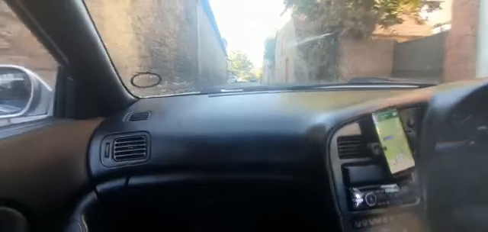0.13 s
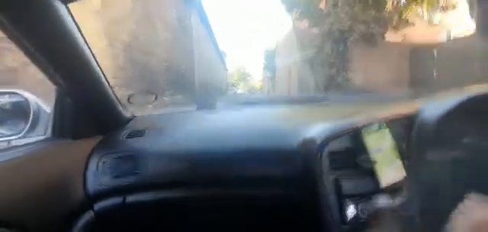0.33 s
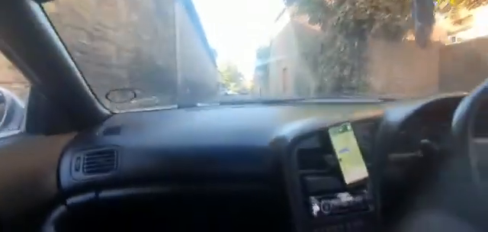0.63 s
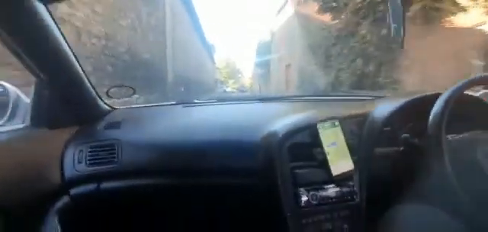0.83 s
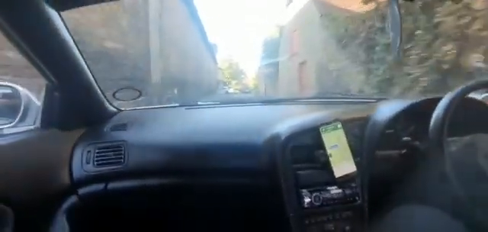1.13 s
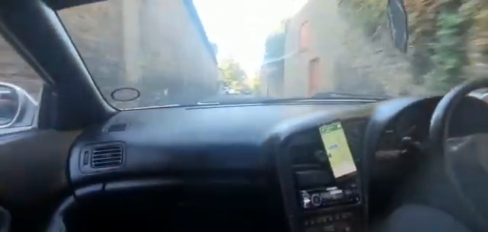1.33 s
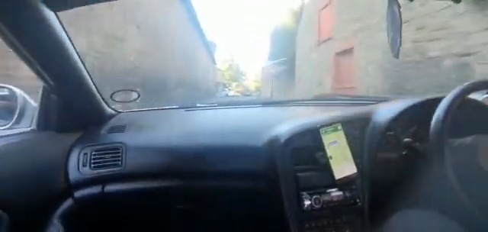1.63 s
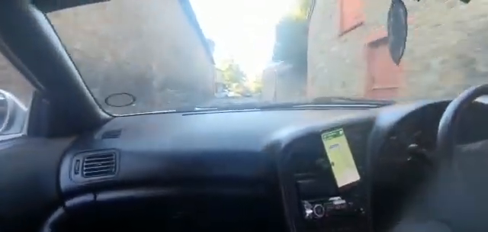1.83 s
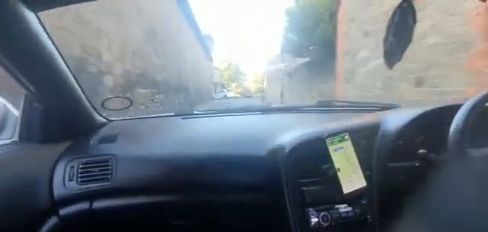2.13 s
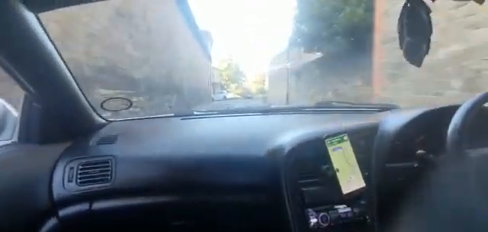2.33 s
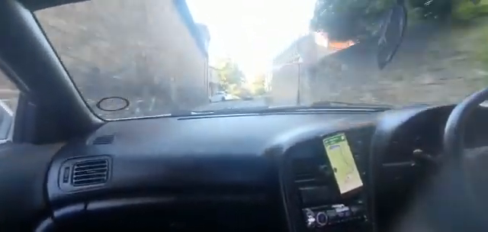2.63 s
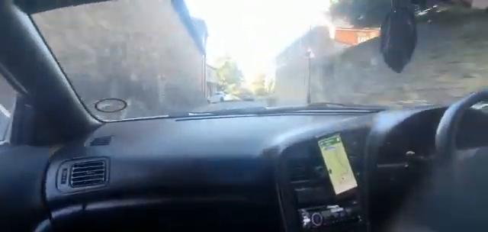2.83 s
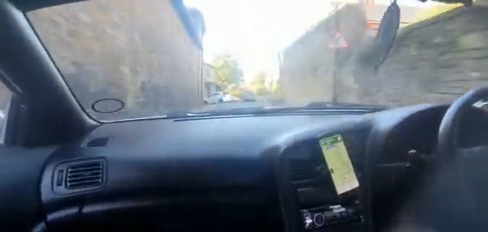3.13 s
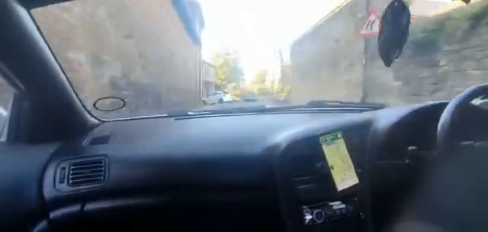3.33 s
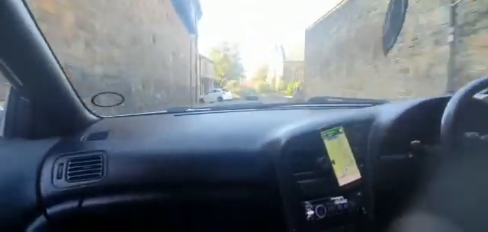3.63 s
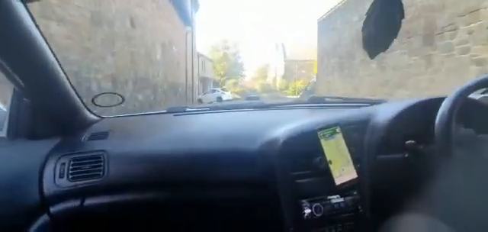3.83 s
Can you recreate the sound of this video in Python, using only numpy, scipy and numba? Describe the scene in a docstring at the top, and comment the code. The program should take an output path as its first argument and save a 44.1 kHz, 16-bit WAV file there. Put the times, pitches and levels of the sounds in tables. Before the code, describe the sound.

A turbocharged four-cylinder car accelerates down a narrow street, its deep boom rising under hissing intake air, then surges in a stuttering train of chuffs and settles to a low drone; phone held in the cabin.

```python
"""Inside a turbo four-cylinder car with the left window open, heard at a phone's two ports after a brief silence.
First it pulls hard: firing orders climb in pitch as the intake rush and the compressor's airy band swell.
The throttle shuts and the compressor surges: a fading train of noise chuffs, with duct resonances ringing, while
the revs fall. The next gear then drones on. Filtered noise makes road rumble and tyre ring throughout."""
import sys
import numpy as np
from scipy import signal
from scipy.fft import rfft, irfft
from scipy.io import wavfile
from scipy.ndimage import uniform_filter1d
from numba import njit

SR = 44100
rng = np.random.default_rng(int(sys.argv[2]) if len(sys.argv) > 2 else 0)


def file_out(sig):
    """Save sig as 16-bit WAV at sys.argv[1]."""
    # one column per channel
    cols = np.atleast_2d(sig).T
    # limit, then scale
    lim = np.clip(cols, -1, 1)
    pcm = np.round(lim * 32767).astype(np.int16)
    wavfile.write(sys.argv[1], SR, pcm)


N = 175518


def undb(db):
    """Decibels to amplitude."""
    return 10 ** (np.asarray(db) / 20)


def unit(x):
    """Scale to rms 1 over all channels together."""
    return x / np.sqrt(np.mean(x ** 2))


def curve(table, column=1):
    """A table column joined by straight lines in time."""
    rows = np.array(table, float)
    return np.interp(np.arange(N) / SR, rows[:, 0], rows[:, column])


def over_hz(table, hz):
    """A table read on a log-frequency axis."""
    rows = np.array(table, float)
    return np.interp(np.log(np.maximum(hz, 1)), np.log(rows[:, 0]), rows[:, 1])


def walk(rate_per_s):
    """Random levels, each held for 1 / rate, smoothed twice; spread near 1."""
    hold = int(SR / rate_per_s)
    steps = np.repeat(rng.standard_normal(N // hold + 1), hold)
    return 1.335 * uniform_filter1d(uniform_filter1d(steps, hold), hold)[:N]


@njit
def svf(x, hz, width_hz):
    """State-variable band-pass with a moving centre, gain 1 there."""
    y, band_state, low_state = np.empty(len(x)), 0., 0.
    for i in range(len(x)):
        g, k = np.tan(np.pi * hz[i] / SR), width_hz[i] / hz[i]
        v = (band_state + g * (x[i] - low_state)) / (1 + g * (g + k))
        band_state = 2 * v - band_state
        low_state = low_state + 2 * g * v
        y[i] = k * v
    return y


def band(pair, hz, width_hz):
    """Both ports through one resonance, then rms 1."""
    return unit(np.array([svf(x, hz + np.zeros(N), width_hz + np.zeros(N)) for x in pair]))


PORT_LAG_S = 0.000429  # right after left

# Level of left over right in noise. Each row: frequency in Hz, difference in dB.
LEFT_OVER_RIGHT_DB = [(60, .5), (250, 2.5), (700, 3), (1300, 4), (1850, 1), (2500, 9), (5000, 10),
                      (7800, 17), (10000, 8), (15000, 11)]
# Share of the noise common to both ports. Each row: frequency in Hz, likeness 0-1.
PORT_LIKENESS = [(30, .99), (130, .93), (290, .5), (640, .35), (1400, .58), (3000, .45), (7000, .36),
                 (15000, .42)]


def air(colour=None):
    """Noise at the two ports: partly alike, later and duller on the right; rms 1."""
    hz = np.fft.rfftfreq(N, 1 / SR)
    common, other = rfft(rng.standard_normal((2, N)))
    like = np.clip(over_hz(PORT_LIKENESS, hz), 0, 1)
    tilt = undb(over_hz(LEFT_OVER_RIGHT_DB, hz) / 2)
    lag_s = PORT_LAG_S * np.clip(hz / 340 - .3, 0, 1)  # none in the bass
    left = common * tilt
    right = (like * common + np.sqrt(1 - like ** 2) * other) * np.exp(-2j * np.pi * hz * lag_s) / tilt
    pair = np.array([left, right]) / (tilt + 1 / tilt)
    if colour is not None:
        pair = pair * undb(over_hz(colour, hz)) * (hz > 15)
    return unit(irfft(pair, N))


ROAD_FLICKER_DB, ROAD_FLICKER_PER_S = 4, 6

# Spectrum of the rumble ahead of the octave bands. Each row: frequency in Hz, relative level in dB per Hz.
ROAD_COLOUR = [(20, -22.5), (45, -8.5), (80, -10.5), (140, -9.5), (170, -18), (240, -25.5), (310, -34),
               (500, -41.5), (1200, -40), (1700, -46.5), (3000, -53), (7000, -83.5), (15500, -102)]
# Level of the rumble. Each row: time in seconds, level in dB.
ROAD_LEVEL_DB = [(.1, -29.5), (1., -25), (1.7, -28.5), (2.4, -25), (3.1, -27.5), (3.97, -23)]


def road():
    """Tyre and body rumble with wind: noise in octave bands, each flickering on its own."""
    noise = air(ROAD_COLOUR)
    rumble = np.zeros((2, N))
    for hz in 30. * 2 ** np.arange(9):
        octave = np.array([svf(x, np.full(N, hz), np.full(N, hz)) for x in noise])
        rumble += undb(ROAD_FLICKER_DB * walk(ROAD_FLICKER_PER_S)) * octave
    return undb(curve(ROAD_LEVEL_DB)) * unit(rumble)


TYRE_HZ, TYRE_WIDTH_HZ, TYRE_MEAN_DB = 233.7, 24.3, -41.5


def tyres():
    """Air ringing inside the tyres: narrow-band noise at a wandering level."""
    return undb(TYRE_MEAN_DB + 2 * walk(4.88)) * band(air(), TYRE_HZ, TYRE_WIDTH_HZ)


# Each row: time in seconds, throttle opening 0-1.
THROTTLE = [(.1, 1), (1.62, 0.69), (1.72, 0.02), (3.4, 0), (3.97, .4)]


def throttle():
    """Throttle opening, which drives roughness, weak orders and the duct's ring while drawing air."""
    return np.clip(curve(THROTTLE), 0, 1)


DUCT_FLICKER_DB, DUCT_DRIFT = 3.5, .012  # drift as share of the centre

# Resonances of the intake duct, means before flicker and drift.
# Each row: centre in Hz, width in Hz, relative level in dB while drawing air, relative level in dB in a chuff.
DUCT_MODES = [(1550, 55, -19, -2), (1890, 55, -14, -3), (2200, 60, -12, 3), (2790, 60, -22, -5),
              (3400, 120, -15, 1.5)]


def duct(column):
    """Air ringing unsteadily in the intake duct: noise through drifting, flickering resonances."""
    flow = air()
    ring = np.zeros((2, N))
    for mode in DUCT_MODES:
        level = undb(mode[column] + DUCT_FLICKER_DB * walk(11))
        centre_hz = mode[0] * (1 + DUCT_DRIFT * walk(5))
        ring += level * band(flow, centre_hz, mode[1])
    return ring


SPOOL_WIDTH_HZ = 380

# Airy band of the spooling compressor. Each row: time in seconds, centre in Hz, mean level in dB.
SPOOL_BAND = [(.1, 4030, -67.5), (.65, 4030, -54.5), (1.15, 4310, -50.5), (1.6, 4630, -58.5),
              (2.1, 4380, -80)]


def spool():
    """Compressor's airy band: noise through a moving band-pass."""
    level_db = curve(SPOOL_BAND, column=2) + 2 * walk(12)
    return undb(level_db) * band(air(), curve(SPOOL_BAND), SPOOL_WIDTH_HZ)


# Rush without the duct's ring. Each row: time in seconds, mean level in dB.
INTAKE_LEVEL_DB = [(.1, -51), (.5, -46.5), (.8, -43.5), (1.05, -40.5), (1.3, -38), (1.55, -37.5),
                   (1.7, -38), (1.95, -39.5), (2.2, -45), (2.6, -48), (3., -54), (3.4, -53), (3.97, -52)]
# Spectrum of the rush. Each row: frequency in Hz, relative level in dB per Hz.
RUSH_COLOUR = [(410, -30.5), (700, 7.5), (1710, -4.5), (2250, -3), (2770, -5), (3320, -4.5), (15500, -28.5)]


def intake():
    """Rush of air that swells with boost and rings the duct while the throttle is open."""
    level_db = curve(INTAKE_LEVEL_DB) + .5 * walk(12)
    rush = air(RUSH_COLOUR) + throttle() * duct(column=2)
    return undb(level_db) * rush


CHUFF_ATTACK_S, CHUFF_TAIL_S, RING_TAIL_S = 0.0056, 0.017, .016
CHUFF_SAG, CHUFF_WIDTH = 0.043, .2  # shares of the centre
CHUFF_AIR_DB = 7  # blast over whoosh
RING_OVER_WHOOSH_DB, RING_GAIN_DB_PER_S = 2, 7  # at the first chuff; growth along the train

# Each row: start in seconds, length of rise and hold in seconds, whoosh level in dB, whoosh centre in Hz.
CHUFF_TRAIN = [(1.735, 0.037, -49, 8740), (1.82, 0.065, -44.5, 7770), (1.96, 0.04, -46.5, 6440),
               (2.075, .045, -50, 6400), (2.175, .04, -51, 5720), (2.275, .04, -52.5, 5600),
               (2.375, 0.031, -56, 5160), (2.465, 0.023, -54, 4630), (2.55, 0.027, -55.5, 4380),
               (2.642, 0.021, -56, 4200), (2.727, 0.029, -60.5, 3670), (2.81, .03, -63, 3700),
               (2.895, 0.025, -62.5, 3600), (2.975, 0.023, -62, 3700), (3.055, 0.023, -65, 3600),
               (3.135, 0.013, -63, 3700), (3.217, 0.017, -65, 3500), (3.295, 0.019, -68.5, 3380)]
# Broad blast of every chuff. Each row: frequency in Hz, relative level in dB per Hz.
BLAST_COLOUR = [(600, -23), (1200, 2), (2500, -10.5), (5000, -8.5), (9000, -16), (12000, -17),
                (15500, -31.5)]


def surge():
    """Each backflow through the compressor rises fast, holds, dies away; its whoosh sags."""
    t = np.arange(N) / SR
    first_s, first_hz = CHUFF_TRAIN[0][0], CHUFF_TRAIN[0][3]
    gain, ring_gain, hz = np.zeros(N), np.zeros(N), np.full(N, 1. * first_hz)
    for start_s, length_s, level_db, centre_hz in CHUFF_TRAIN:
        age = np.maximum(t - start_s, 0)
        after = np.maximum(age - length_s, 0)
        rise = undb(level_db) * np.minimum(age / CHUFF_ATTACK_S, 1)
        gain += rise * np.exp(-after / CHUFF_TAIL_S)
        # the ring fades more slowly along the train than the blast
        ring_db = RING_OVER_WHOOSH_DB + RING_GAIN_DB_PER_S * (start_s - first_s)
        ring_gain += rise * np.exp(-after / RING_TAIL_S) * undb(ring_db)
        sagging_hz = centre_hz * (1 - CHUFF_SAG * np.minimum(age / length_s / 2, 1))
        hz = np.where(t >= start_s, sagging_hz, hz)
    whoosh = band(band(air(), hz, CHUFF_WIDTH * hz), hz, 2 * CHUFF_WIDTH * hz)
    blast = undb(CHUFF_AIR_DB) * air(BLAST_COLOUR)
    return gain * (whoosh + blast) + ring_gain * unit(duct(column=3))


ROUGH_PULL, ROUGH_COAST, ROUGH_PER_S = .4, .93, 45  # shares of uneven firing


def tone(order, cycles):
    """Complex order of rms 1; whole orders dip together at each firing, a sharp dip in pressure."""
    return -np.sqrt(2) * np.exp(2j * np.pi * order * cycles)


def uneven(share):
    """Random complex gain: uneven firing breaks up an order."""
    scatter = (walk(ROUGH_PER_S) + 1j * walk(ROUGH_PER_S)) / np.sqrt(2)
    return np.sqrt(1 - share ** 2) + share * scatter


def roughness():
    """Share of uneven firing, from coasting to pulling."""
    return ROUGH_COAST + (ROUGH_PULL - ROUGH_COAST) * throttle()


def ports(order, hz):
    """Complex gains: the right port hears the higher orders later and weaker."""
    side = np.array([[1], [-1]])
    return np.exp(side * (.0005 + 1j * np.pi * PORT_LAG_S) * np.maximum(order * hz - 40, 0))


SWAY_DB, SWAY_PER_S = 1.2, 2  # left over right

# Firing tone, mean of the ports. Each row: time in seconds, level in dB.
FIRING_LEVEL_DB = [(.1, -13.5), (.16, -10.5), (.23, -15), (.42, -9.5), (.62, -16), (.66, -11), (.82, -9),
                   (.94, -12), (1.11, -13), (1.22, -8.5), (1.49, -7.5), (1.88, -16), (1.96, -10.5),
                   (2.24, -10), (2.29, -17), (2.34, -11.5), (2.6, -18), (2.72, -14), (2.84, -26.5),
                   (3.01, -16.5), (3.12, -24), (3.19, -19.5), (3.97, -15.5)]
# Each row: time in seconds, level of order 2 in dB, level of order 3 in dB; both before the port gains.
OVERTONE_LEVELS_DB = [(.1, -23.5, -24), (.2, -20.5, -25), (.42, -19, -29), (.5, -24, -22),
                      (.62, -20.5, -32), (.78, -24, -28), (.86, -33, -36), (.97, -21.5, -42),
                      (1.13, -31.5, -38), (1.27, -23.5, -41), (1.5, -26, -42), (1.7, -29.5, -42),
                      (2., -39, -40), (2.4, -40.5, -37), (2.72, -30.5, -33), (2.9, -31.5, -45),
                      (3.6, -40, -48), (3.97, -34, -42)]


def drone(hz, cycles):
    """Firing tone leaning between the ports as the phone sways, and two less steady overtones."""
    lean_db = SWAY_DB * walk(SWAY_PER_S) * np.array([[.5], [-.5]])
    orders = undb(curve(FIRING_LEVEL_DB) + lean_db) * tone(1, cycles)
    share = roughness() - ROUGH_PULL * throttle() / 2
    for column in (1, 2):
        order = column + 1
        level = undb(curve(OVERTONE_LEVELS_DB, column))
        orders = orders + level * uneven(share) * tone(order, cycles) * ports(order, hz)
    return orders.real


ORDER_WOBBLE_DB, WOBBLE_PER_S = 5, 6
GROWL_HZ, GROWL_WIDTH_HZ, GROWL_DB = 520, 130, 12  # centre at a firing rate of 90 Hz
GROWL_CLIMB = 2.6  # Hz per Hz of firing rate

# Weak orders before growl and wobble.
# Each row: multiple of the firing rate, level in dB pulling, level in dB coasting.
WEAK_ORDERS = [(.5, -43.5, -43), (1.5, -39.5, -41.5), (2.5, -50.5, -47.5), (3.5, -50.5, -47.5),
               (4, -48.5, -55), (5, -53.5, -65), (6, -56, -70), (7, -55.5, -68)]


def weak_orders(hz, cycles):
    """Weak orders, broken up by uneven firing and lifted as they pass the exhaust resonance."""
    load, rough = throttle(), roughness()
    growl_hz = GROWL_HZ + GROWL_CLIMB * (hz - 90)
    orders = 0
    for order, pull_db, coast_db in WEAK_ORDERS:
        growl_db = GROWL_DB * np.exp(-((order * hz - growl_hz) / GROWL_WIDTH_HZ) ** 2)
        wobble_db = ORDER_WOBBLE_DB * walk(WOBBLE_PER_S)
        level = undb(coast_db + (pull_db - coast_db) * load + wobble_db + growl_db)
        orders = orders + level * uneven(rough) * tone(order, cycles) * ports(order, hz)
    return orders.real


RASP_START_DB, RASP_DB_PER_HZ = -56, 0.2084  # at the first firing rate; per Hz above it
RASP_HZ, RASP_WIDTH_HZ, RASP_DECAY_CYCLES = 484, 230, .6


def rasp(hz, cycles):
    """Gas noise that bursts once a firing, decays until the next and swells with the firing rate."""
    gas = band(band(air(), RASP_HZ, RASP_WIDTH_HZ), RASP_HZ, 2 * RASP_WIDTH_HZ)
    bursts = gas * np.exp(-(cycles % 1) / RASP_DECAY_CYCLES)
    return undb(RASP_START_DB + RASP_DB_PER_HZ * (hz - FIRING_RATE_HZ[0][1])) * unit(bursts)


PITCH_JITTER, JITTER_PER_S = .003, 25  # jitter as share of the rate

# Each row: time in seconds, firing rate in Hz before jitter.
FIRING_RATE_HZ = [(.1, 64.71), (.39, 69.67), (1.14, 98.13), (1.63, 117.9), (1.91, 117.8), (2.2, 105.6),
                  (2.79, 78.3), (2.9, 65.22), (3.25, 66.8), (3.36, 63.75), (3.97, 64.43)]


def engine():
    """Drone in the cabin, weak orders and rasp share one jittered count of firing cycles."""
    hz = curve(FIRING_RATE_HZ)
    cycles = np.cumsum(hz * (1 + PITCH_JITTER * walk(JITTER_PER_S))) / SR
    return drone(hz, cycles) + weak_orders(hz, cycles) + rasp(hz, cycles)


def scene():
    """All sources together."""
    return tyres() + engine() + spool() + intake() + surge() + road()


START_S, TOP_HZ = .1061, 15830


def record(dry):
    """The phone opens at START_S and cuts the top with a steep low-pass."""
    opened = dry * (np.arange(N) >= START_S * SR)
    return signal.sosfilt(signal.ellip(14, .3, 70, TOP_HZ, fs=SR, output="sos"), opened)


dry = scene()
out = record(dry)
file_out(out)
```